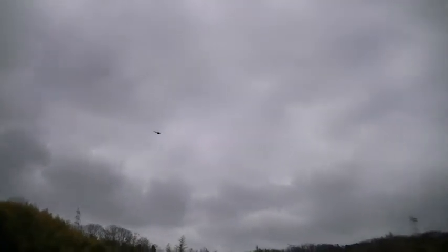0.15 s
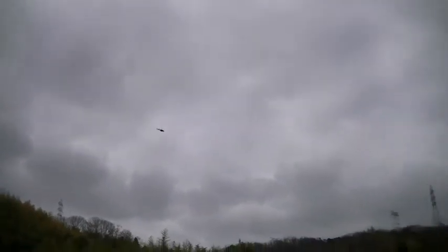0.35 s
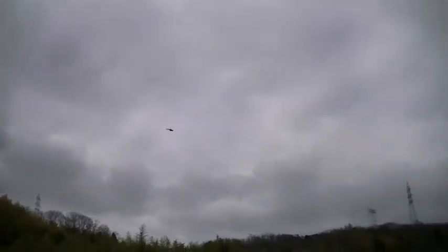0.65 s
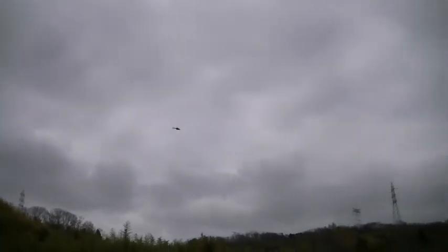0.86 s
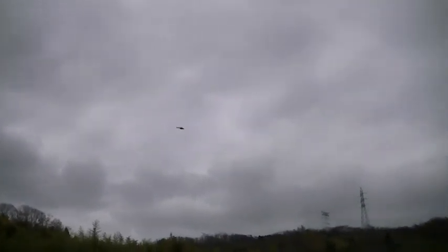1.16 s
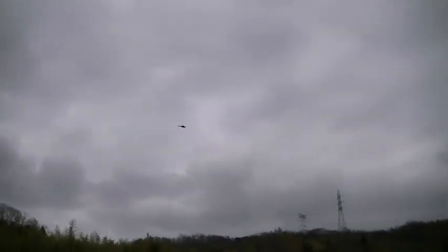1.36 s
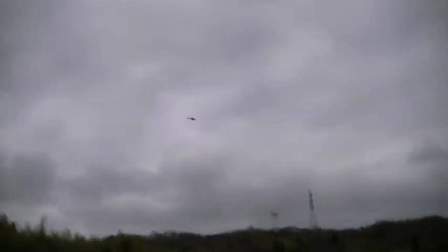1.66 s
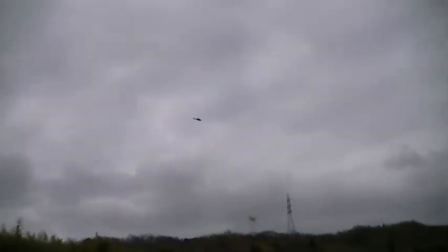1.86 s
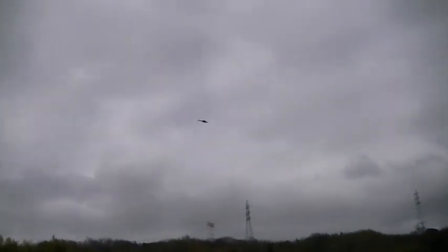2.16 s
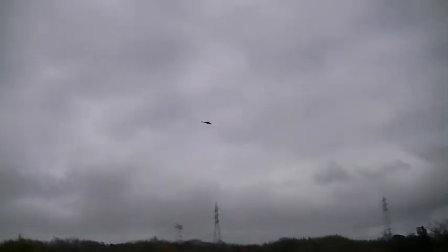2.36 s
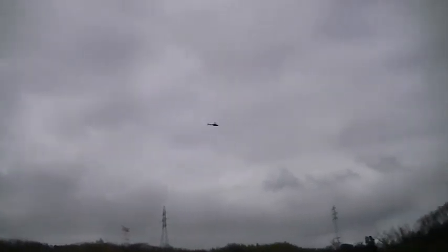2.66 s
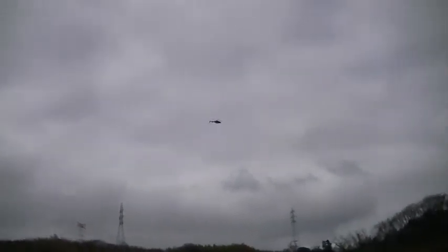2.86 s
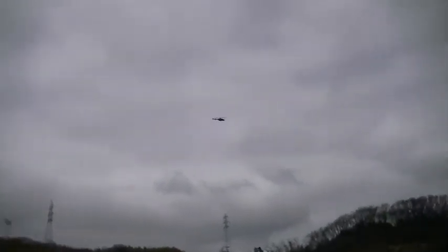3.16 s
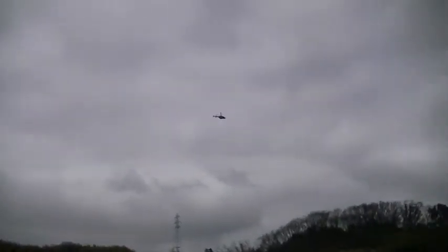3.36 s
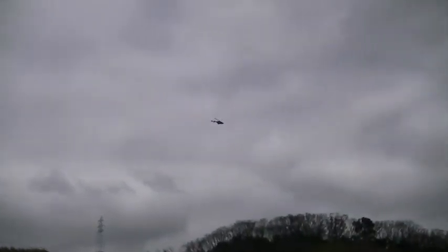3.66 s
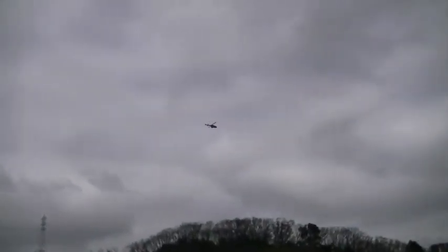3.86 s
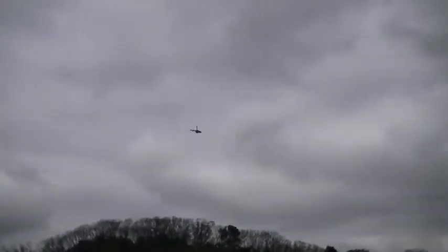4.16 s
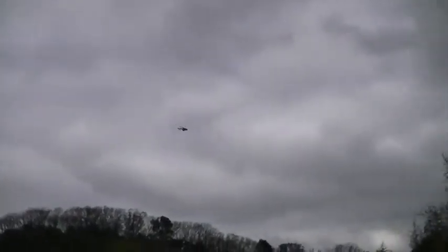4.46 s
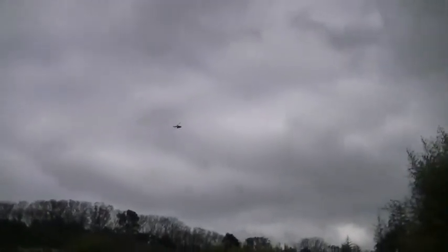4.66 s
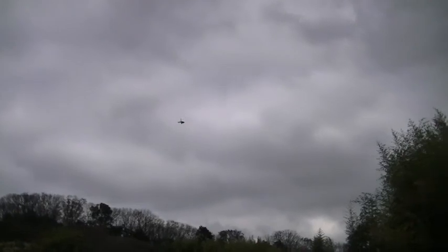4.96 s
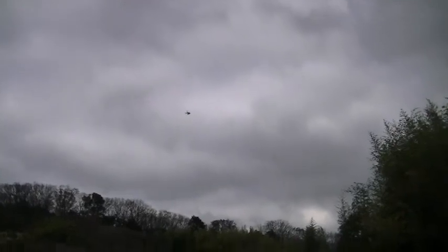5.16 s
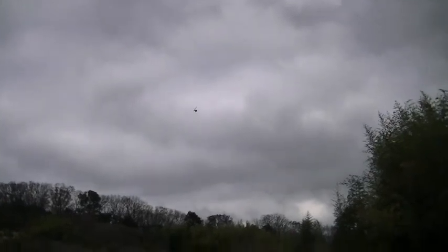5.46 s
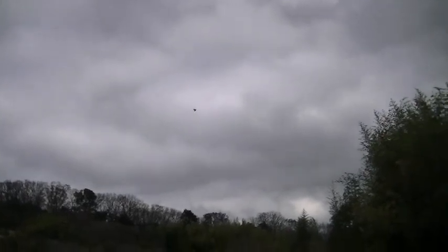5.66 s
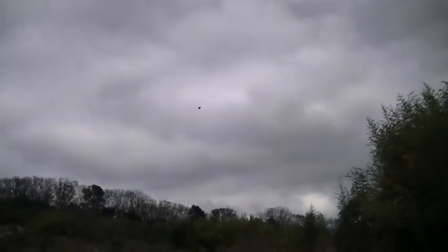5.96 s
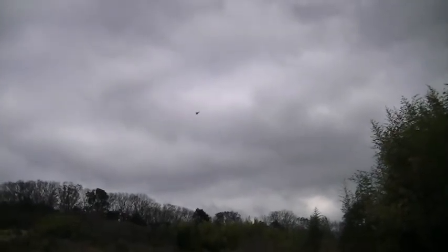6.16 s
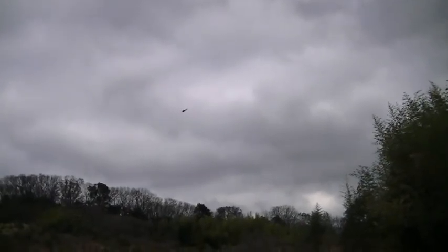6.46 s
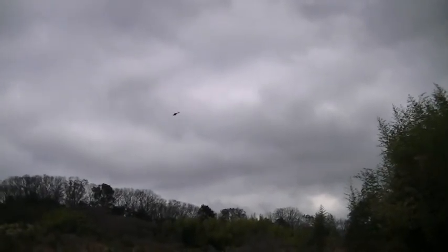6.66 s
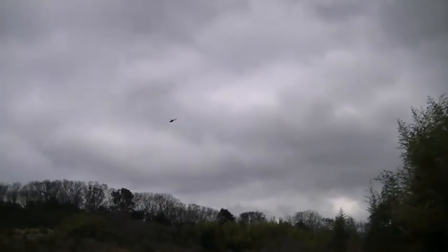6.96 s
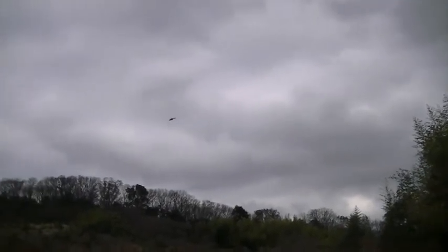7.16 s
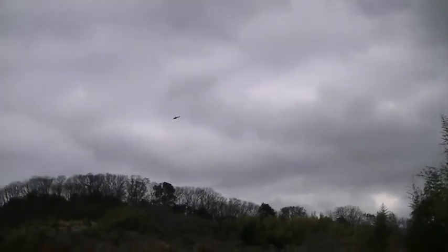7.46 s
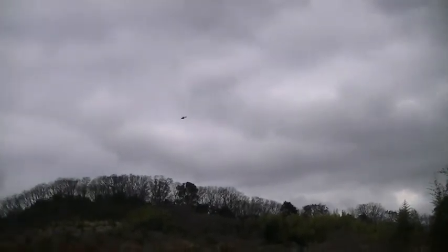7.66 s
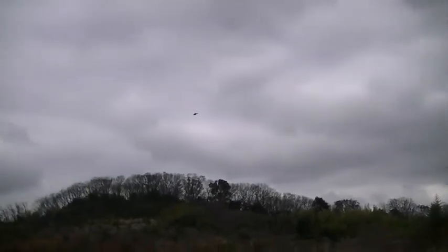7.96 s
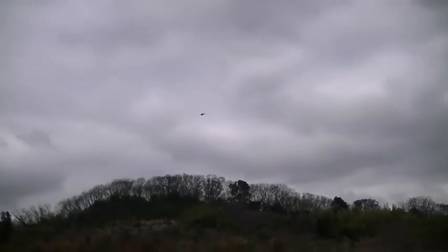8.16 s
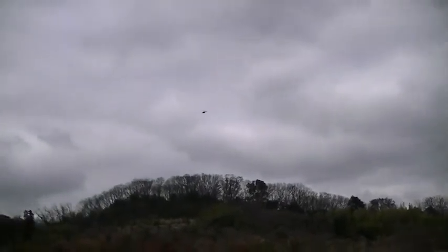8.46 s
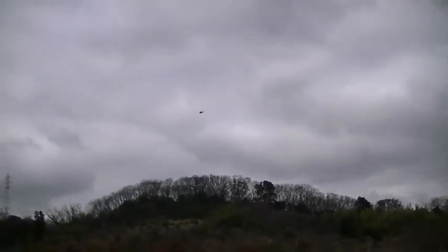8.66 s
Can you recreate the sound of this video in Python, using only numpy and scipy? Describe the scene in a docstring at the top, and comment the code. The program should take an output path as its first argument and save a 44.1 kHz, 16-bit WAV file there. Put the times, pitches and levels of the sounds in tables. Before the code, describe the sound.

An electric model helicopter flies outdoors, its motor, gears and rotors making a steady whine of several tones that drift gently in pitch together. An airy swish of blades swells as it comes nearer, then falls back while the whine carries on. The handheld camera gives a sharp click near the start and another midway, followed by soft bumps. The open land murmurs very faintly behind.

```python
"""The whine and airy swish of an electric model helicopter flying over an open field.
One drive train turns motor, gear, main rotor and tail rotor, so all their tones drift together.
Gear teeth whine and chatter; air rushing over the blades throbs, whooshes and briefly whistles.
An echo off the ground combs the sound, and the land murmurs faintly behind it.
It is all heard through a small camera that clicks and bumps softly in the hand."""
import sys
import numpy as np
from scipy import signal
from scipy.fft import rfft, irfft, next_fast_len
from scipy.io import wavfile
from scipy.ndimage import uniform_filter1d, map_coordinates

SR = 44100
rng = np.random.default_rng(int(sys.argv[2]) if len(sys.argv) > 2 else 0)


def int16_out(signal):
    """Quantize to a 16-bit WAV file."""
    q = np.round(np.clip(np.atleast_2d(signal).T, -1, 1) * 32767)
    wavfile.write(sys.argv[1], SR, q.astype(np.int16))


N = 388521
TIME = np.arange(N) / SR


def gain_of(db):
    """Decibels to amplitude."""
    return np.exp(np.asarray(db) * (np.log(10) / 20))


def unit_rms(x):
    """Scales to rms 1."""
    return x / np.sqrt(np.mean(x ** 2) + 1e-20)


def curves(rows):
    """Automation lanes: one for each column after the time, in straight lines between the rows."""
    times, *columns = np.transpose(rows)
    return [np.interp(TIME, times, column) for column in columns]


def swells(rows):
    """Bell-shaped swells from rows of (centre s, length s, height, ..): one lane per height column."""
    return sum(np.outer(heights, np.exp(-(2 * (TIME - centre) / length) ** 2))
               for centre, length, *heights in rows)


def equalise(x, points):
    """Filters by an EQ curve of (Hz, dB) points."""
    size = next_fast_len(N + 4096, True)
    hz, db = np.transpose(points)
    log_hz = np.log(np.fft.rfftfreq(size, 1 / SR) + 1)
    return irfft(rfft(x, size) * gain_of(np.interp(log_hz, np.log(hz), db)), size)[:N]


def drift(rate):
    """A smooth random wander, rms near 1, that changes about rate times a second."""
    knots = signal.resample_poly(rng.standard_normal(1200), 4, 1)
    return np.interp(TIME * rate, np.arange(len(knots)) / 4, knots)


def add(mix, start, sound):
    """Mixes a sound in at a start time in seconds."""
    part = mix[round(start * SR):][:len(sound)]
    part += sound[:len(part)]


def quarter_lag(x):
    """Delays every frequency by a quarter cycle."""
    return signal.hilbert(x, next_fast_len(N))[:N].imag


def tone(turns, db, flicker_db, rate=14, smear=0.38):
    """A partial whose level and phase waver."""
    level = gain_of(db + flicker_db * drift(1.5 * rate))
    angle = 2 * np.pi * (turns % 1 + rng.random()) + smear * flicker_db * drift(rate)
    return np.sqrt(2) * level * np.sin(angle)


def overtones(turns, rows, near_db, flicker_db, smear, restless_hz=13000, air_loss_per_khz=0.039):
    """A shaft's weaker tones grow as it nears, the high ones most, since air absorbs them."""
    shaft_hz = turns[-1] / TIME[-1]
    out = np.zeros(N)
    for multiple, db in rows:
        hz = multiple * shaft_hz
        lift_db = (0.24 + air_loss_per_khz * hz / 1000) * near_db
        depth_db = flicker_db * (1 + (hz / restless_hz) ** 2)  # the highest tones flicker most
        out += tone(round(multiple) * turns, db + lift_db, depth_db, rate=16, smear=smear)
    return out


def flares(turns, rows, flicker_db=2.0, smear=0.35):
    """Single overtones briefly swell, waver and fade."""
    out, waver = np.zeros(N), drift(22)
    for centre, reach, multiple, db in rows:
        during = np.flatnonzero(abs(TIME - centre) < reach)
        flicker, wobble = (waver[(during + shift) % N] for shift in rng.integers(0, N, 2))
        swell = np.cos(np.pi / 2 * (TIME[during] - centre) / reach) ** 2
        angle = 2 * np.pi * (round(multiple) * turns[during] + rng.random()) + smear * wobble
        out[during] += np.sqrt(2) * gain_of(db + flicker_db * flicker) * swell * np.sin(angle)
    return out


# Fader ride of the distant bed. Each row: time in seconds, level in dB.
MURMUR_LEVEL = [(0, -77), (2, -99), (3.2, -75), (4.5, -91), (5.9, -80), (6.5, -74), (7.8, -75.5),
                (8.8, -81)]
# Its dark tone. Each row: frequency in Hz, gain in dB.
MURMUR_EQ = [(140, -8), (195, 0.5), (240, 4.5), (400, -3), (1000, -10), (4000, -61)]

def far_murmur():
    """The low murmur of the land beyond the field."""
    bed = unit_rms(equalise(rng.standard_normal(N), MURMUR_EQ))
    return bed * gain_of(curves(MURMUR_LEVEL)[0] + 1.7 * drift(11))


# Camera clicks. Each row: start in seconds, ring gain in dB, most excited pitch in Hz, snap gain in dB.
CASE_CLICKS = [(0.724, -8, 3520, -16.5), (.7297, -33, 9000, -25), (4.4812, -21, 3000, -36),
               (4.4808, -5, 6800, -38), (4.4809, -1, 2600, -27), (4.4831, -4.5, 3830, -41),
               (7.1619, -22.5, 5550, -26.5)]
# Resonances of the case. Each row: pitch in Hz, relative level in dB, time to fall 60 dB in seconds.
CASE_MODES = [(1600, 0, 0.036), (2670, -8, 0.013), (2830, -12.5, 0.026), (3830, -12, 0.0069),
              (4180, -2, 0.0034), (5100, -8, 0.006), (6020, -1.5, 0.0084), (6620, -9.5, 0.0038),
              (8570, -1.5, 0.0065)]
# Soft bumps of the hand. Each row: start in seconds, gain in dB, pitch in Hz.
HAND_BUMPS = [(5.399, -41, 315), (5.401, -31, 940), (5.789, -45, 276)]

def handling(spread_octaves=0.19, bump_t60=0.034):
    """Dry snaps ring the plastic case, too small to radiate bass; soft bumps only give a low knock."""
    out, t = np.zeros(N), np.arange(SR // 10) / SR
    low_cut = signal.butter(3, 800, "highpass", fs=SR, output="sos")
    high_cut = signal.butter(8, 9200, fs=SR, output="sos")
    for start, ring_db, centre_hz, snap_db in CASE_CLICKS:
        contact = 2 * np.pi * 0.91 * centre_hz * t - np.pi
        add(out, start, -gain_of(snap_db) * contact * np.exp(-contact ** 2 / 2))
        ring = np.zeros(len(t))
        for hz, mode_db, t60 in CASE_MODES:
            excitation = 1 / (1 + (np.log2(hz / centre_hz) / spread_octaves) ** 2)
            ring += excitation * gain_of(mode_db - 60 * t / t60) * np.sin(2 * np.pi * hz * t)
        ring *= 1 - np.exp(-t / 0.0001)
        add(out, start, gain_of(ring_db) * signal.sosfilt(np.vstack([low_cut, high_cut]), ring))
    soft_attack = (1 - np.exp(-t / 0.0025)) ** 2
    for start, db, hz in HAND_BUMPS:
        add(out, start, gain_of(db - 60 * t / bump_t60) * np.sin(2 * np.pi * hz * t) * soft_attack)
    return out


# Lag of the bounce off the field. Each row: time in seconds, delay in milliseconds.
ECHO_DELAY = [(0, 3.37), (0.25, 3.23), (1.1, 3.03), (1.78, 3.13), (2.1, 3.28), (2.58, 3.39), (2.95, 3.21),
              (3.34, 3.18), (3.55, 3.26), (4.0, 3.2), (4.32, 2.98), (4.65, 2.74), (5.15, 2.61), (5.8, 2.57),
              (6.8, 2.42), (7.65, 2.33), (8.2, 2.43), (8.8, 2.6)]

def ground_echo(x, strength, grass_hz=6500):
    """Adds a bounce dulled by grass; its delay follows the flight height, so tones swell and fade."""
    dull = equalise(x, [(grass_hz / 2, 0), (grass_hz, -3), (2 * grass_hz, -12)])
    delay_samples = curves(ECHO_DELAY)[0] * SR / 1000
    echo = map_coordinates(dull, [np.arange(N) - delay_samples], order=3)
    return (x + strength * echo) / np.sqrt(1 + strength ** 2)


# Tone of the drive train's chatter. Each row: frequency in Hz, gain in dB.
CHATTER_EQ = [(300, -37.5), (700, 7.5), (2200, 3), (3300, -4.5), (4400, 3.5), (5500, -13.5), (6700, -8),
              (7800, -7.5), (10000, -42)]

def chatter(turns, near_db, level_db, flaws):
    """Flaws round a gear wheel come back at every turn: a fine buzz of close partials."""
    one_turn = rng.standard_normal(flaws)
    buzz = map_coordinates(one_turn, [turns % 1 * flaws], order=3, mode="grid-wrap")
    return unit_rms(equalise(buzz, CHATTER_EQ)) * gain_of(level_db + 0.62 * near_db + drift(16))


# Breathy whistles. Each row: centre in seconds, length in seconds, level at the crest in dB.
BLADE_WHISTLES = [(1.78, 0.43, -48), (3.8, 0.43, -48), (4.618, .22, -50), (6.62, .3, -57), (7.0, .3, -55),
                  (7.6, .45, -56)]

def whistle(centre_hz=2165, width_hz=180):
    """Eddies shed from the blade edges crowd into one narrow band."""
    shape = [(-2, -70), (-1, -15), (-0.5, 0), (0.5, 0), (1, -15), (2, -70)]
    band = [(centre_hz + widths * width_hz, db) for widths, db in shape]
    level = swells([(centre, length, gain_of(db)) for centre, length, db in BLADE_WHISTLES])[0]
    return unit_rms(equalise(rng.standard_normal(N), band)) * level


# The main rotor's drone. Each row: shaft multiple, relative level in dB.
ROTOR_PARTIALS = [(8, -79.5), (12, -74), (16, -70), (18, -68.5), (20, -71.5), (22, -68.5), (24, -65.5),
                  (26, -68), (30, -65.5), (32, -73), (34, -68), (38, -63.5), (40, -62.5), (46, -71),
                  (48, -67)]

def main_rotor(turns, bite_db, trim_db=-5.0):
    """The long blades drone on multiples of their passing rate, louder as they bite."""
    return sum(tone(round(multiple) * turns, db + bite_db + trim_db, flicker_db=1.9, rate=8)
               for multiple, db in ROTOR_PARTIALS)


# Fader ride of the swish, up as the helicopter nears. Each row: time in seconds, relative level in dB.
SWISH_LEVEL = [(0.0, -46.5), (0.92, -46), (1.1, -43.5), (1.6, -43.5), (2.08, -40), (2.62, -36.5),
               (3.21, -38.5), (3.68, -38.5), (4.47, -41.5), (4.59, -42.5), (4.84, -41.5), (5.22, -48),
               (6.03, -49), (7.3, -48.5), (7.91, -48), (8.02, -48), (8.81, -50)]
# Tone of the rushing air. Each row: frequency in Hz, gain in dB.
SWISH_EQ = [(130, -22), (200, -63), (280, -23.5), (420, -11), (650, -7.5), (1400, -1), (2300, -0.5),
            (3600, -8), (4500, -8), (6800, -12), (8800, -19), (10300, -30), (13000, -84)]
# Blades cut rough air. Each row: centre in seconds, length in seconds, swell in dB, treble lift in dB.
BLADE_WHOOSHES = [(0.616, 0.1, 3, 0.5), (1.15, 0.18, 1, 3), (1.33, 0.15, -0.3, 4.5), (1.75, .1, 2, 2),
                  (2.2, 0.25, 2.1, 1), (2.896, 0.13, 0, 3), (3.23, 0.3, -1, 5), (3.45, 0.087, 2.5, 4),
                  (3.656, 0.064, 2.5, 0.5), (3.84, 0.31, 1.2, 1.5), (4.2, 0.22, -0.8, 5),
                  (4.63, 0.077, 4, -1.5), (4.82, .12, 0.5, 2.5), (6.82, 0.22, 1.3, 2), (7.55, 0.24, 2, 1),
                  (7.77, 0.27, 2, 4), (8.75, 0.35, 2.5, 5)]

def swish(rotor_turns, tail_turns, near_db, bite_db, trim_db=-2.0):
    """Turbulence throbs as each blade swings toward the listener; the tail chops it into a rasp."""
    swell_db, bright_db = swells(BLADE_WHOOSHES)
    air = equalise(rng.standard_normal(N), SWISH_EQ)
    bass = equalise(air, [(800, 0), (1100, -40), (1200, -100)])
    treble = equalise(air, [(2600, -100), (2800, -40), (3400, 0)])
    body = air - bass - treble
    bass_db = -0.5 * near_db + 0.3162 * bite_db  # thinner when near, fuller under load
    treble_db = -2.5 + bright_db + 0.7 * drift(20)
    rush = body + bass * gain_of(bass_db) + treble * gain_of(treble_db)
    throb = 1 + 0.059 * np.cos(2 * np.pi * 2 * rotor_turns)  # two blades pass each turn
    rasp = 1 + 0.077 * gain_of(0.5 * near_db) * np.cos(2 * np.pi * 2 * tail_turns)
    level_db = curves(SWISH_LEVEL)[0] + swell_db + trim_db + drift(35)
    return rush / np.std(body) * throb * rasp * gain_of(level_db)


# Gear whine at the tooth rate. Each row: time in seconds, level in dB.
WHINE_LEVEL = [(0.1, -68), (0.3, -56.5), (0.45, -64), (0.56, -56), (0.66, -66), (0.76, -55.5), (1.16, -53),
               (1.32, -58.5), (1.55, -73), (1.72, -57), (2.0, -59.5), (2.14, -45), (2.28, -55), (2.38, -65),
               (2.5, -54.5), (3.2, -65), (3.44, -46), (3.57, -67), (3.72, -65), (3.87, -51.5), (4.12, -53),
               (4.31, -65), (4.44, -48.5), (4.7, -55), (5.0, -62.5), (5.38, -65), (5.5, -55.5), (5.66, -63),
               (5.8, -52.5), (6.1, -64.5), (6.3, -51), (6.7, -71), (6.92, -50.5), (7.12, -72), (7.88, -72),
               (8.04, -57), (8.25, -56), (8.45, -74)]
# Its strongest sideband, three rotor multiples up. Each row: time in seconds, level in dB.
THIRD_SIDEBAND_LEVEL = [(0.0, -84), (2.28, -73.5), (3.14, -56), (3.32, -67), (3.62, -56), (4.0, -63),
                        (4.4, -62), (5.15, -61), (5.35, -62), (5.6, -66), (5.8, -58), (6.05, -74),
                        (6.3, -70), (6.6, -80), (7.4, -75), (7.66, -52), (7.94, -80), (8.8, -55)]
# Its other sidebands. Each row: offset in rotor multiples, relative level in dB.
WHINE_SIDEBANDS = [(-2, -29.5), (-1, -16), (1, -11), (2, -26.5), (4, -15.5), (8, -18)]
# These swell and roughen the whine. Each row: centre in seconds, length in seconds, boost in dB.
WHINE_RASPS = [(3.85, 0.4, 11), (5.86, 0.23, 4), (6.3, 0.2, 4), (7.0, 0.18, 11), (8.68, 0.33, 18)]

def gear(tooth_turns, rotor_turns, trim_db=-0.2):
    """Pinion teeth strike the main gear, a little unevenly round each turn of the rotor."""
    tooth_db, third_db = curves(WHINE_LEVEL)[0], curves(THIRD_SIDEBAND_LEVEL)[0]
    whine = tone(tooth_turns, tooth_db + trim_db, flicker_db=1.8, rate=15, smear=0.2)
    third_turns = tooth_turns + 3 * rotor_turns
    whine += tone(third_turns, third_db + trim_db, flicker_db=1.5, rate=39, smear=0.16)
    rasp_db = uniform_filter1d(tooth_db, SR) + swells(WHINE_RASPS)[0]
    for offset, db in WHINE_SIDEBANDS:
        whine += tone(tooth_turns + round(offset) * rotor_turns, rasp_db + db, flicker_db=4.0, rate=18)
    return whine


# The motor's lead tones. Each row: time in seconds, levels in dB of shaft multiples 2 and 4.
MOTOR_LEVELS = [(0.0, -67, -57.0), (0.3, -53.5, -50.5), (0.68, -52.5, -47.5), (1.0, -46.5, -61.0),
                (1.55, -45, -51), (1.9, -46.5, -47.5), (2.36, -47.5, -59), (2.7, -51.5, -72.0),
                (2.82, -53, -51.0), (3.06, -46, -54.0), (3.5, -48, -47), (3.84, -48, -43.5),
                (4.02, -49.5, -53.0), (4.26, -60, -44.0), (4.44, -51, -61.0), (4.56, -62, -50.0),
                (4.86, -61, -48.0), (5.28, -60.5, -64.0), (5.58, -57.5, -52.0), (6.0, -54, -72.0),
                (6.8, -62.5, -62), (7.6, -60.5, -63), (7.92, -71, -53), (8.28, -72, -55.0),
                (8.8, -62, -57.0)]
# Its weaker tones. Each row: shaft multiple, relative level in dB.
MOTOR_PARTIALS = [(3, -68.5), (5, -71), (6, -63), (7, -66.5), (11, -74), (12, -77), (14, -70.5),
                  (15, -70.5), (16, -75.5), (24, -82.5), (25, -76.5), (26, -76.5)]
# Its flares. Each row: centre in seconds, fade each side in seconds, shaft multiple, level in dB.
MOTOR_ACCENTS = [(0.684, 0.22, 6, -60.5), (1.17, .3, 15, -71), (1.3, 0.41, 9, -62), (1.71, 0.28, 9, -57),
                 (2.34, 0.31, 6, -53), (4.06, .3, 7, -63), (4.1, 0.64, 25, -64), (4.22, 0.22, 16, -57.5),
                 (4.37, .25, 6, -63), (5.18, 0.51, 5, -54.5), (5.86, .3, 11, -77), (5.95, 0.54, 6, -65),
                 (6.06, .3, 14, -65), (6.112, 0.29, 9, -70), (6.21, 0.37, 15, -69), (6.5, 0.24, 6, -63),
                 (6.595, 0.25, 7, -59.5), (6.823, 0.2, 9, -72), (7.57, .3, 9, -64), (7.85, 0.44, 6, -59),
                 (8.64, 0.2, 16, -68), (8.66, .25, 7, -61), (8.717, 0.26, 14, -60)]

def motor(turns, near_db, bite_db):
    """The motor sings on multiples of its speed, less steadily when near: (lead, backing tones)."""
    shake = gain_of(0.22 * near_db)
    lead = sum(tone(multiple * turns, db, flicker_db=0.95 * shake, rate=18, smear=0.27)
               for multiple, db in zip((2, 4), curves(MOTOR_LEVELS)))
    hum_db = -64.5 + 0.32 * bite_db  # the fundamental grows under load
    hum = tone(turns, hum_db, flicker_db=0.8 * shake, rate=20, smear=0.31)
    weak = overtones(turns, MOTOR_PARTIALS, near_db, flicker_db=4.0, smear=0.26)
    return lead + flares(turns, MOTOR_ACCENTS), hum + gain_of(-2.0 + 0.09 * bite_db) * weak


# The tail rotor's strong tones. Each row: time in seconds, levels in dB of shaft multiples 4, 2 and 8.
TAIL_LEVELS = [(0.0, -58.5, -67.0, -50.0), (0.54, -47.5, -56.0, -63.0), (1.44, -58, -62.0, -45.5),
               (1.98, -58, -71.0, -64.0), (2.1, -64, -71.0, -51.0), (2.82, -78, -66.0, -54.0),
               (3.42, -75, -69.0, -48.0), (4.02, -57, -68.0, -68.0), (4.32, -50.5, -75.0, -48.0),
               (4.74, -51, -67.0, -70.0), (5.1, -59, -70.0, -47.0), (5.58, -62, -67.0, -67.0),
               (6.06, -79, -68.0, -65.0), (6.6, -53.5, -73.0, -54.0), (7.02, -53.5, -74.0, -51.0),
               (7.56, -52.5, -76.0, -70.0), (8.22, -49.0, -66.0, -53.0), (8.8, -47, -61.0, -59.0)]
# Its low drone on multiple 3. Each row: time in seconds, level in dB.
TAIL_DRONE_LEVEL = [(0, -74), (.5, -71), (1.2, -57), (2.6, -56), (3.7, -60), (4.2, -76), (5, -61.5),
                    (7.7, -66.5), (8.8, -75)]
# Multiple 6, which surges in the turn. Each row: time in seconds, level in dB.
TAIL_SURGE_LEVEL = [(0, -67), (0.9, -59), (1.7, -76), (2.5, -56), (2.9, -64), (3.3, -62), (3.9, -70),
                    (4.28, -44), (4.45, -49.5), (4.62, -39), (4.85, -57.5), (5.4, -57.5), (5.7, -82),
                    (6.8, -66), (7.4, -67.5), (8.7, -59)]
# Its weaker tones. Each row: shaft multiple, relative level in dB.
TAIL_PARTIALS = [(10, -67), (12, -60.5), (18, -70.5), (22, -80), (23, -65), (24, -65.5), (25, -67),
                 (26, -69.5), (27, -72.5), (28, -76.5), (30, -70), (31, -69.5), (34, -81), (38, -69.5)]
# Its flares. Each row: centre in seconds, fade each side in seconds, shaft multiple, level in dB.
TAIL_ACCENTS = [(.78, 0.19, 26, -60), (1.1, .25, 12, -59), (1.33, 0.43, 23, -60), (1.33, .25, 26, -61),
                (1.9, 0.46, 12, -50), (2.05, 0.22, 18, -58), (2.14, 0.15, 8, -43), (2.14, 0.19, 25, -53.5),
                (2.15, 0.22, 10, -55), (2.42, 0.23, 10, -46), (2.78, .15, 12, -56), (2.8, 0.14, 10, -47),
                (3.24, 0.16, 10, -54), (3.3, 0.28, 26, -62), (3.5, 0.13, 7, -52), (3.55, 0.38, 31, -65),
                (3.82, .25, 12, -52), (4.53, .2, 12, -49), (5.174, 0.42, 24, -60), (5.5, 0.48, 31, -74),
                (5.703, 0.22, 25, -68), (5.8, .25, 34, -70), (6.62, 0.48, 12, -60), (7.11, .2, 22, -63),
                (7.6, 0.33, 34, -64), (7.7, .4, 12, -65), (8.7, 0.32, 23, -68), (8.7, .3, 26, -64)]

def tail_rotor(turns, near_db, bite_db):
    """Two small blades buzz, roughened by the main rotor's wake: (lead, backing tones)."""
    shake_db = 0.29 * gain_of(0.19 * np.clip(bite_db, 0, 6))
    fourth_db, second_db, eighth_db = curves(TAIL_LEVELS)
    drone_db, surge_db = curves(TAIL_DRONE_LEVEL)[0], curves(TAIL_SURGE_LEVEL)[0]
    lead = sum(tone(multiple * turns, db, multiple * shake_db, smear=0.31)
               for multiple, db in [(2, second_db), (3, drone_db), (4, fourth_db), (6, surge_db)])
    upper = tone(8 * turns, eighth_db, 8 * shake_db)
    weak = overtones(turns, TAIL_PARTIALS, near_db, flicker_db=2.5, smear=0.4)
    return lead + flares(turns, TAIL_ACCENTS), upper + gain_of(-2.0) * weak


# Tail shaft speed, Doppler shift included. Each row: time in seconds, turns per second.
TAIL_SPEED = [(0.0, 177.53), (0.4, 178.86), (0.6, 179.5), (0.8, 180.58), (1.2, 182.28), (2.15, 184.62),
              (2.4, 184.56), (2.8, 183.72), (3.2, 182.48), (4.0, 178.87), (4.4, 177.0), (4.8, 175.55),
              (5.1, 175.16), (5.6, 174.67), (6.0, 173.96), (6.4, 174.28), (6.8, 175.34), (8.0, 181.89),
              (8.4, 183.57), (8.81, 184.94)]
# How hard the main blades bite. Each row: time in seconds, load in dB.
BLADE_BITE = [(0, -1), (1, -2.5), (2, 0.5), (2.6, 0.5), (3.05, 14.5), (3.5, 12), (4, 5.5), (4.4, 10),
              (4.65, 15.5), (4.95, 15.5), (5.25, 2.5), (5.6, 0), (6.4, -3.5), (7.5, 5.5), (8.2, -5.5),
              (8.8, -7)]
# How strongly the field throws the rush back. Each row: time in seconds, echo gain as a fraction.
RUSH_ECHO_SEND = [(0, 0.52), (.55, 0.53), (1.2, 0.21), (1.8, 0.52), (2.4, 0.58), (3.1, 0.59), (3.7, 0.63),
                  (4.8, 0.23), (5.4, 0.14), (6.4, 0.19), (7.5, 0.4), (8.1, 0.15), (8.8, 0.36)]
# What differs between the two microphones. Each row: frequency in Hz, side gain in dB.
SIDE_EQ = [(100, 19), (300, -23.5), (1000, -23.5), (2200, -21.5), (4500, -21.5), (8000, -45), (10000, -55)]
PINION_TEETH, MAIN_TEETH, MOTOR_PER_TAIL_TURN = 13, 162, 8 / 3

def scene():
    """All shafts are geared together; the two close microphones hear nearly the same."""
    tail_turns = np.cumsum(curves(TAIL_SPEED)[0] * (1 + 0.00027 * drift(10))) / SR
    motor_turns = tail_turns * MOTOR_PER_TAIL_TURN
    tooth_turns = motor_turns * PINION_TEETH
    rotor_turns = tooth_turns / MAIN_TEETH
    swish_db, bite_db = curves(SWISH_LEVEL)[0], curves(BLADE_BITE)[0]
    near_db = swish_db - swish_db.mean()  # a louder swish stands for a nearer helicopter
    tail_lead, tail_backing = tail_rotor(tail_turns, near_db, bite_db)
    motor_lead, motor_backing = motor(motor_turns, near_db, bite_db)
    lead = tail_lead + motor_lead + gear(tooth_turns, rotor_turns)
    backing = ground_echo(tail_backing + motor_backing, strength=0.49)
    rush = chatter(rotor_turns, near_db, level_db=-54.0, flaws=600)
    rush += chatter(tail_turns, near_db, level_db=-67.0, flaws=128)
    rush += main_rotor(rotor_turns, bite_db) + swish(rotor_turns, tail_turns, near_db, bite_db)
    rush = ground_echo(rush, strength=curves(RUSH_ECHO_SEND)[0])
    case = handling()
    mid = lead + backing + rush + whistle() + case + far_murmur()
    # Sound from one side reaches the microphones a moment apart, so their difference lags
    # a quarter cycle; it is strongest for the case, right beside them.
    side = equalise(quarter_lag(mid), SIDE_EQ) + 0.15 * quarter_lag(case) + 0.04 * case
    return np.array([mid + side, mid - side]) * gain_of([[-0.25], [0.25]])


# The camera's tone. Each row: frequency in Hz, gain in dB.
CAMERA_EQ = [(100, 3.5), (150, -14), (200, -0.5), (9200, 0), (10800, -2.5), (11800, -5)]

def record(dry, wind_cut_hz=225, top_hz=12900):
    """A steep wind filter, the camera's colour, and the band limit."""
    thin = signal.sosfilt(signal.butter(5, wind_cut_hz, "highpass", fs=SR, output="sos"), dry)
    coloured = np.array([equalise(channel, CAMERA_EQ) for channel in thin])
    band_limit = signal.firwin(511, top_hz, window=("kaiser", 9), fs=SR)
    return signal.oaconvolve(coloured, band_limit[None], "same")


dry = scene()
out = record(dry)
int16_out(out)
```